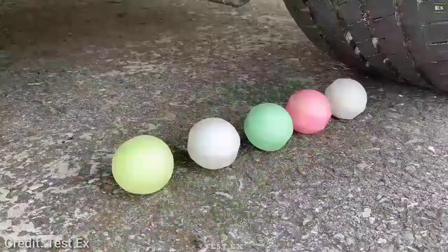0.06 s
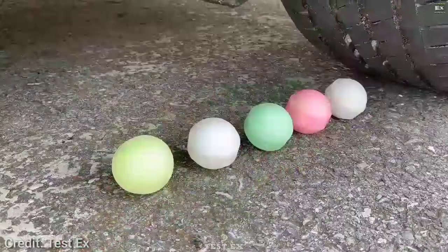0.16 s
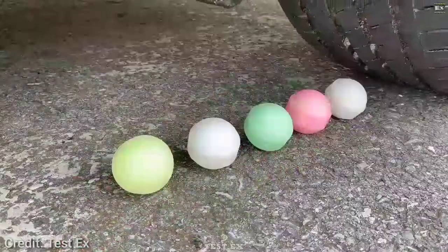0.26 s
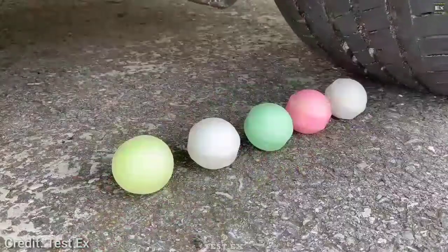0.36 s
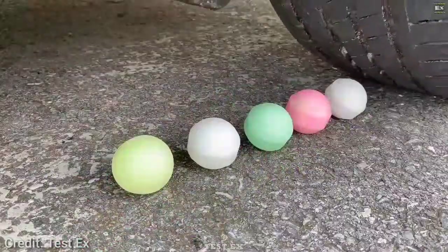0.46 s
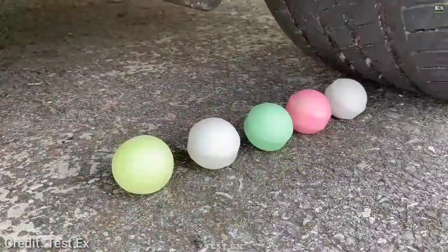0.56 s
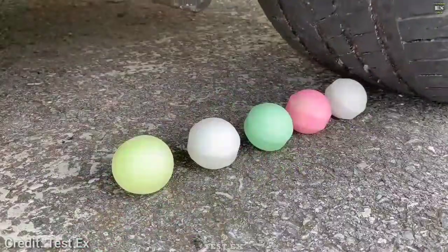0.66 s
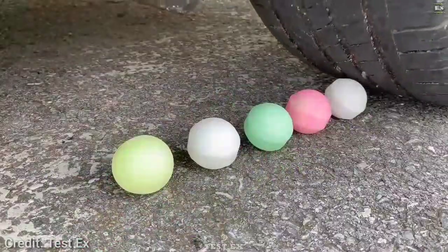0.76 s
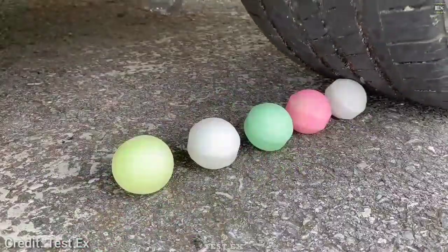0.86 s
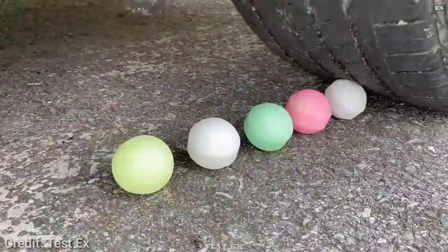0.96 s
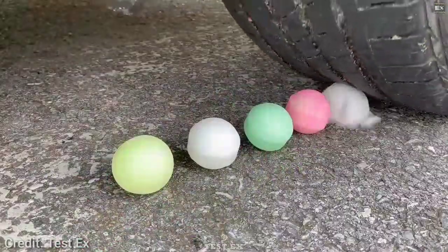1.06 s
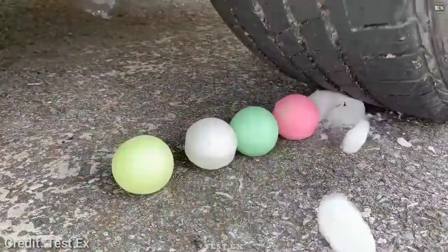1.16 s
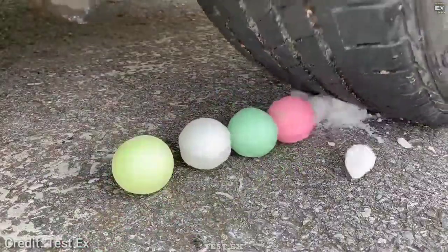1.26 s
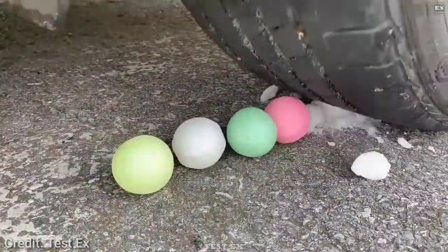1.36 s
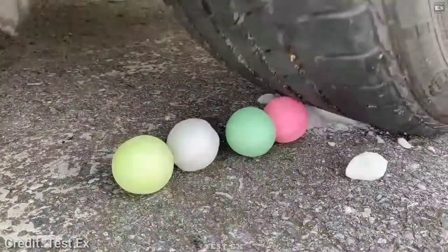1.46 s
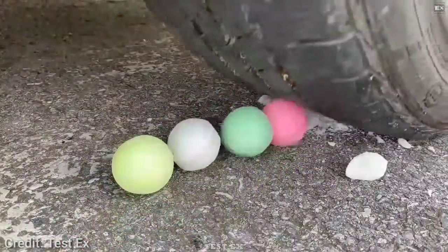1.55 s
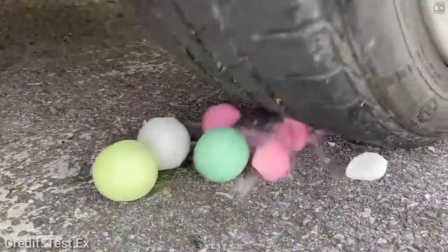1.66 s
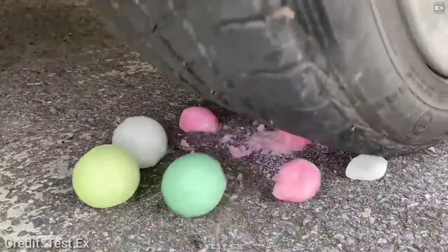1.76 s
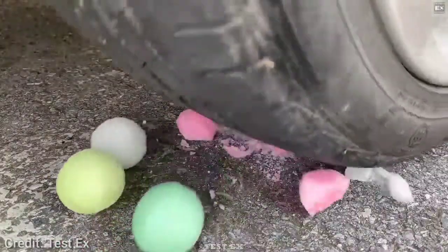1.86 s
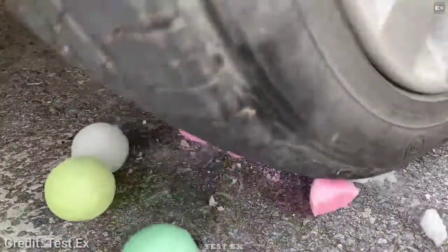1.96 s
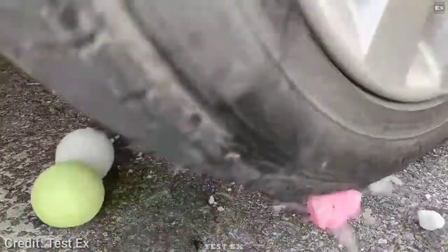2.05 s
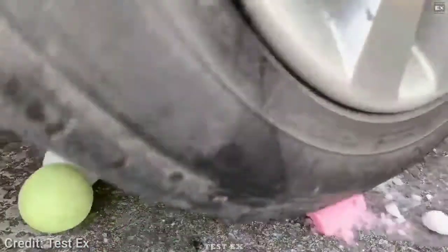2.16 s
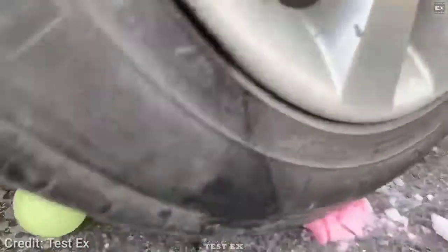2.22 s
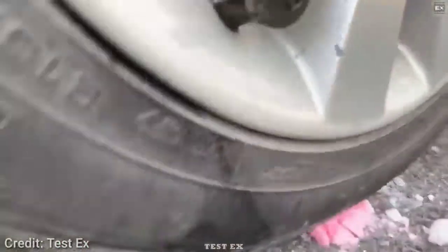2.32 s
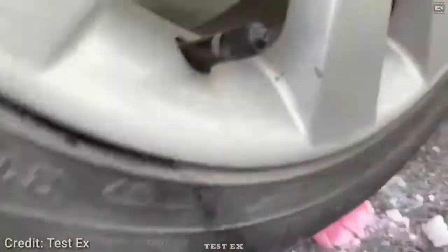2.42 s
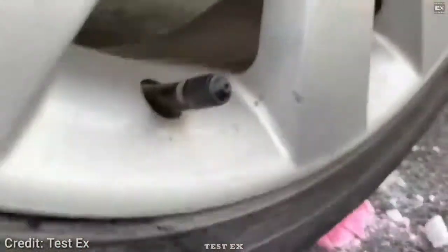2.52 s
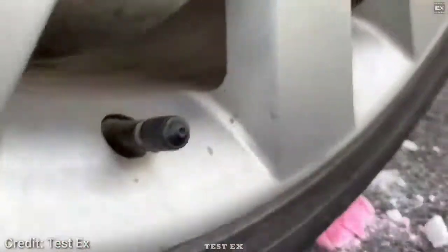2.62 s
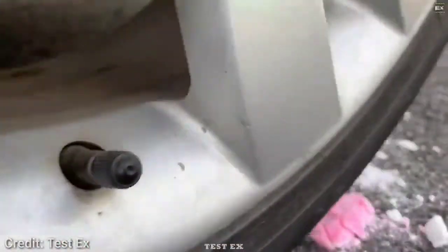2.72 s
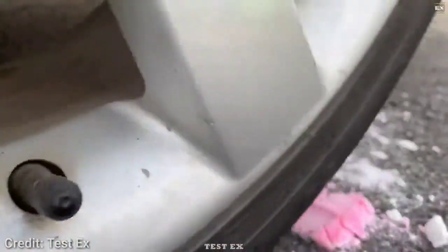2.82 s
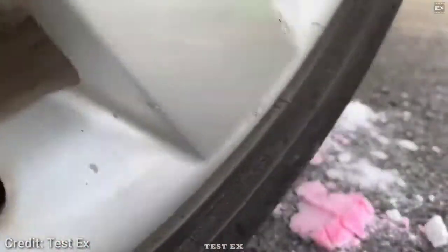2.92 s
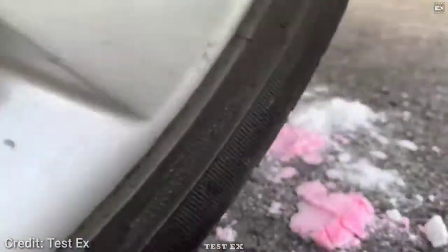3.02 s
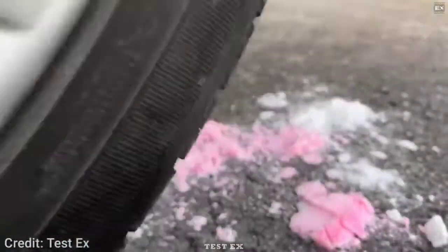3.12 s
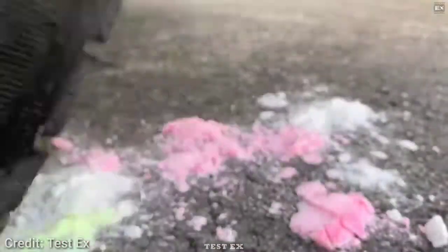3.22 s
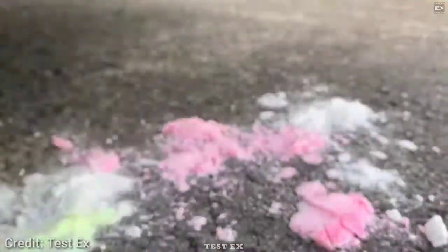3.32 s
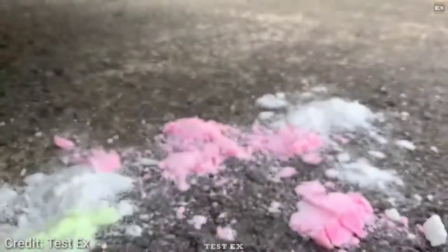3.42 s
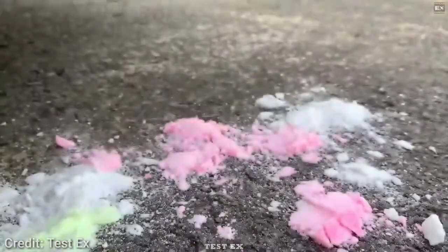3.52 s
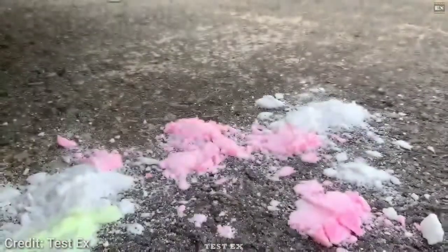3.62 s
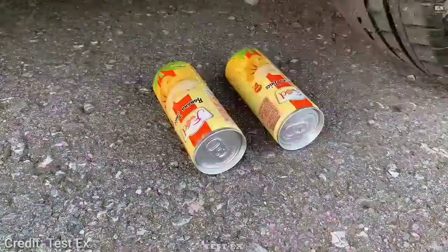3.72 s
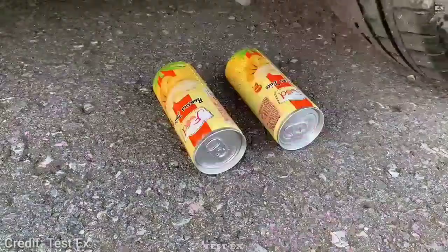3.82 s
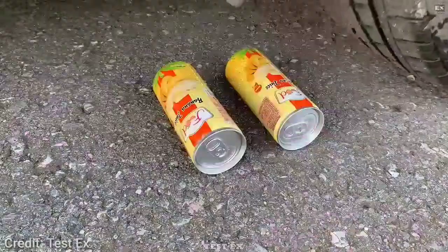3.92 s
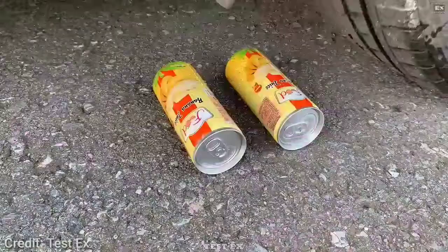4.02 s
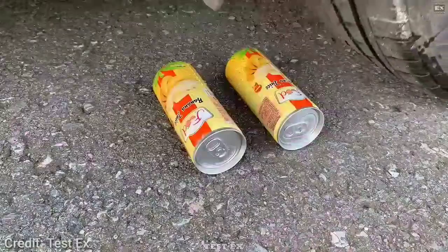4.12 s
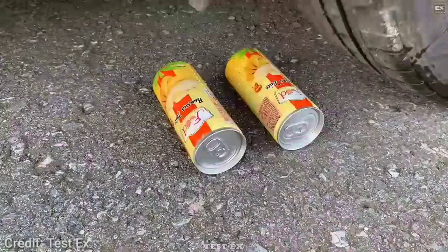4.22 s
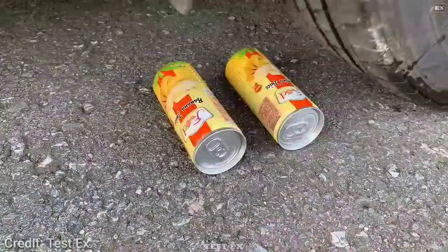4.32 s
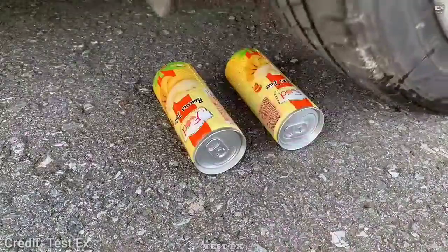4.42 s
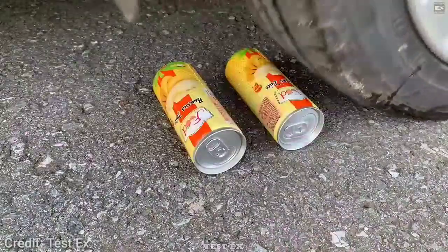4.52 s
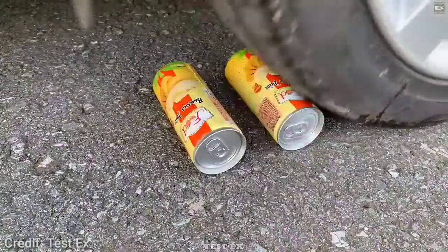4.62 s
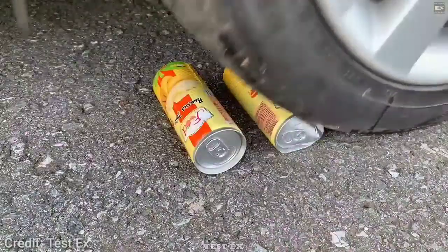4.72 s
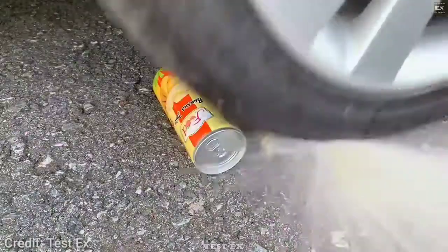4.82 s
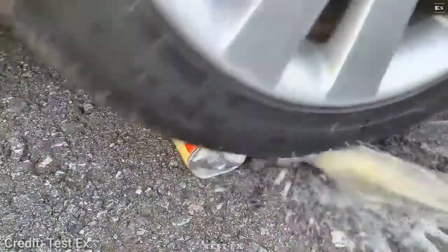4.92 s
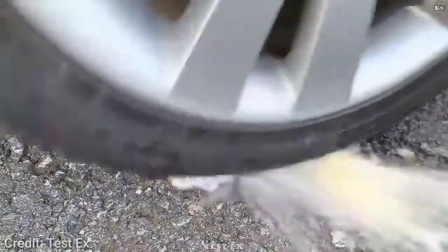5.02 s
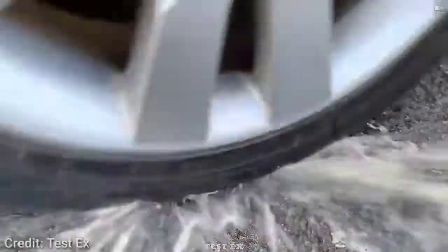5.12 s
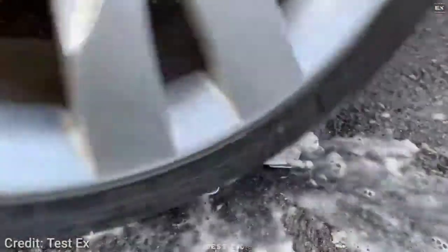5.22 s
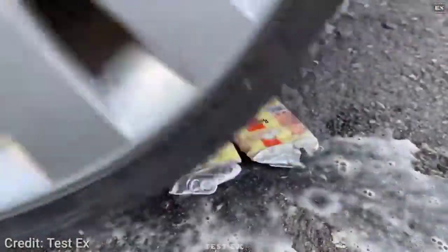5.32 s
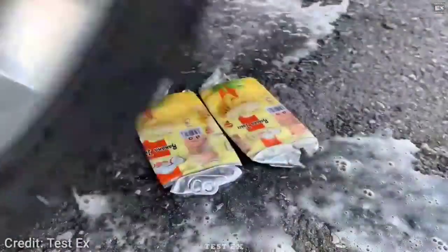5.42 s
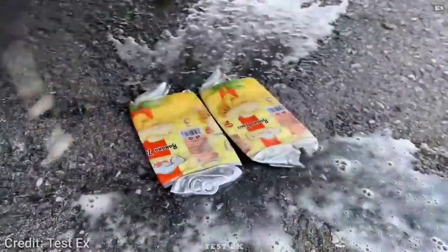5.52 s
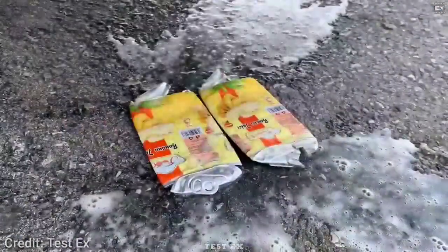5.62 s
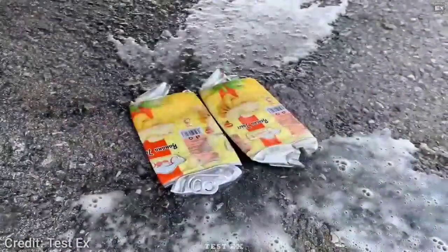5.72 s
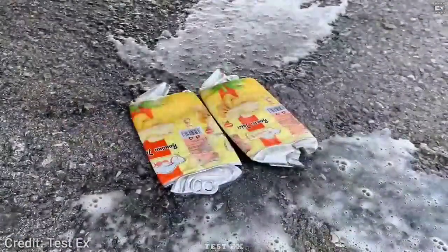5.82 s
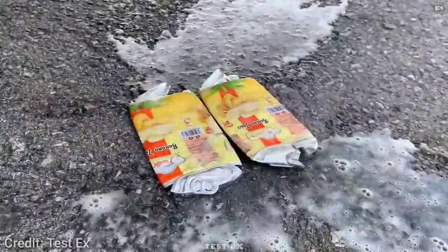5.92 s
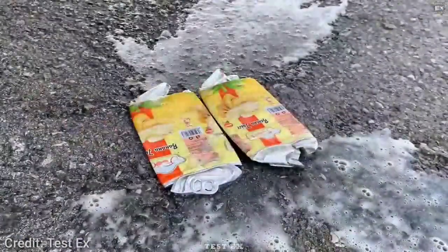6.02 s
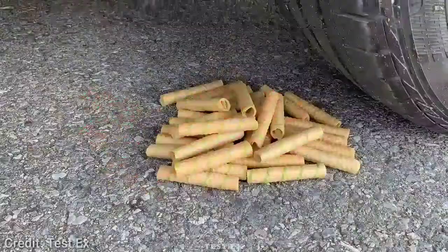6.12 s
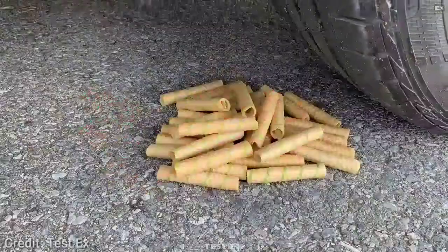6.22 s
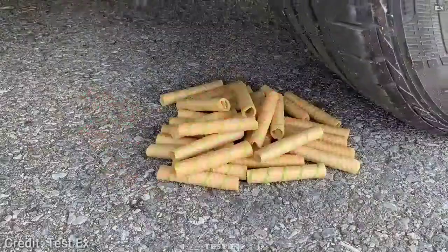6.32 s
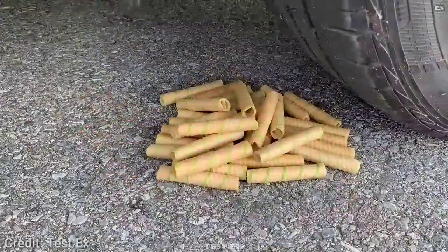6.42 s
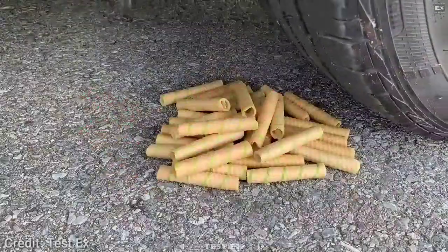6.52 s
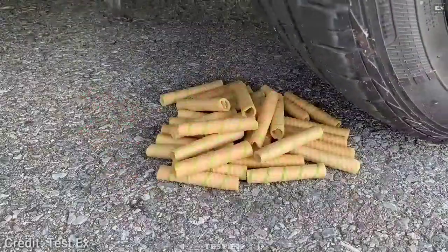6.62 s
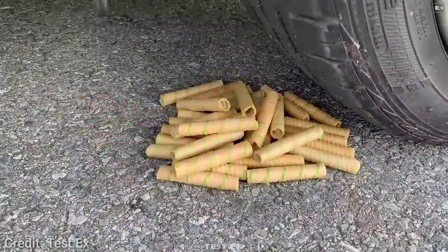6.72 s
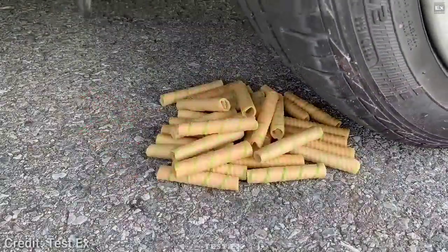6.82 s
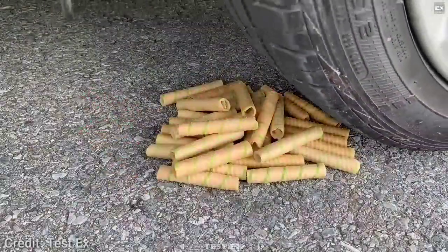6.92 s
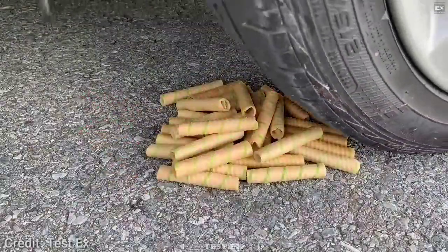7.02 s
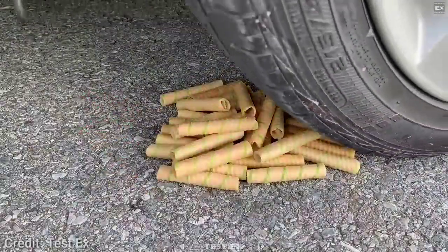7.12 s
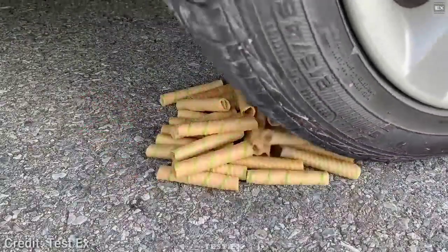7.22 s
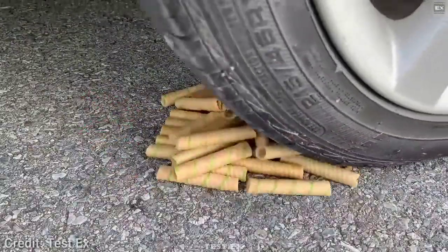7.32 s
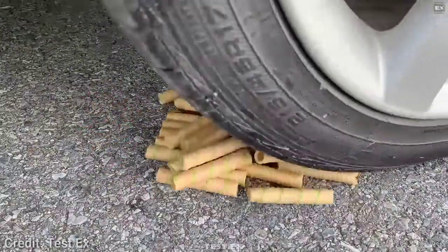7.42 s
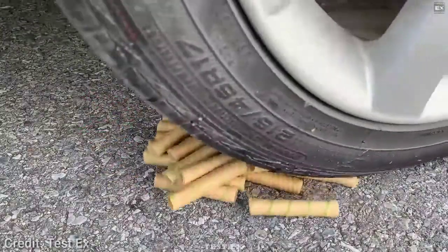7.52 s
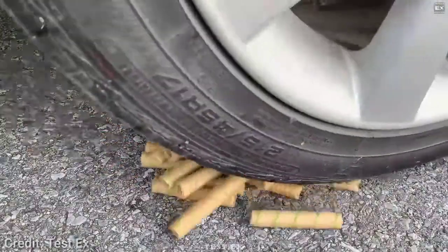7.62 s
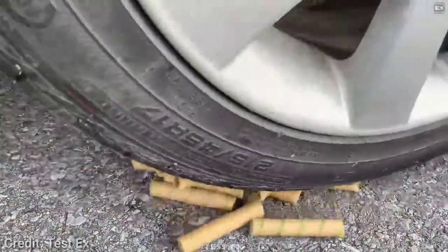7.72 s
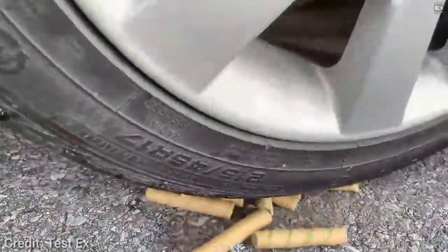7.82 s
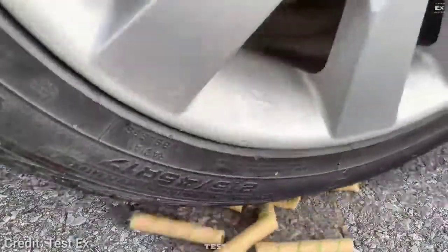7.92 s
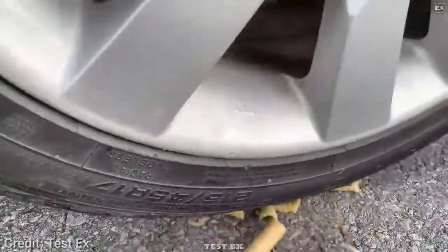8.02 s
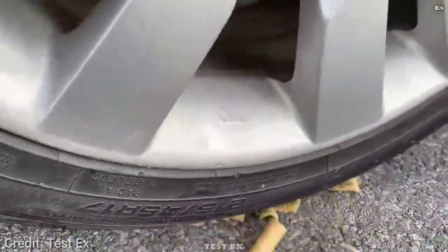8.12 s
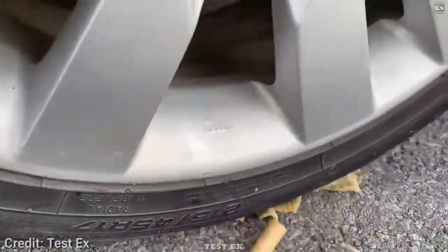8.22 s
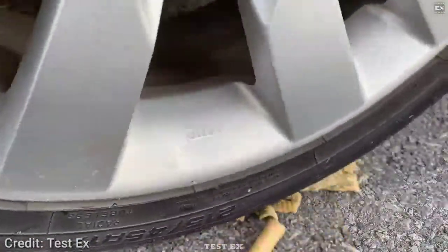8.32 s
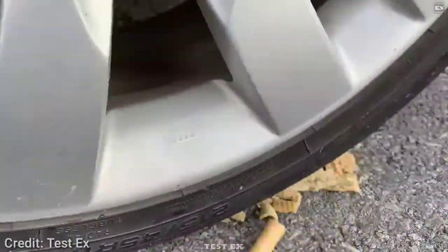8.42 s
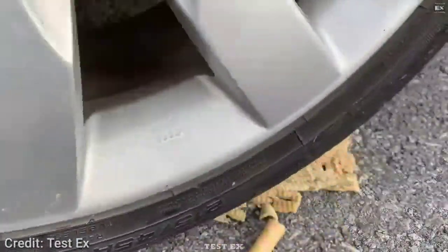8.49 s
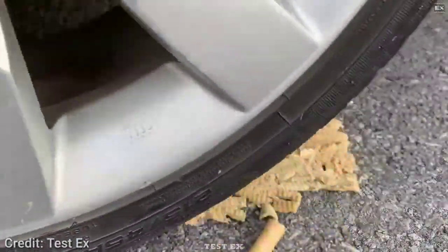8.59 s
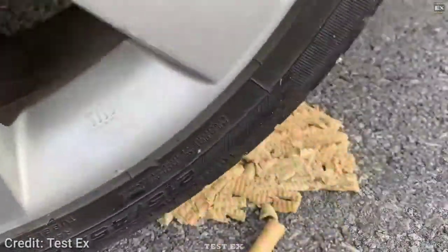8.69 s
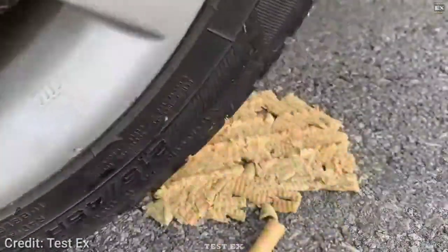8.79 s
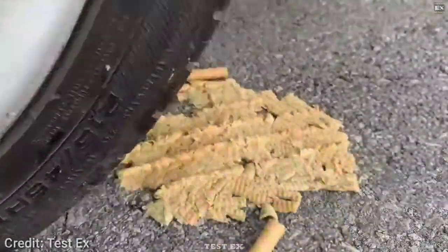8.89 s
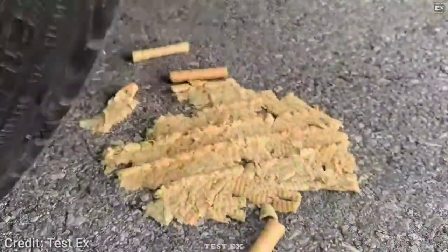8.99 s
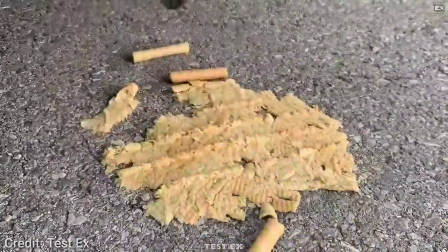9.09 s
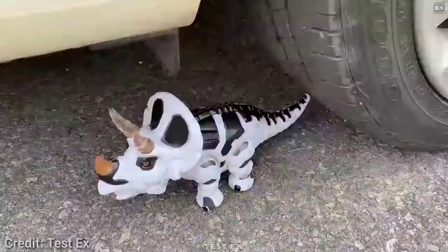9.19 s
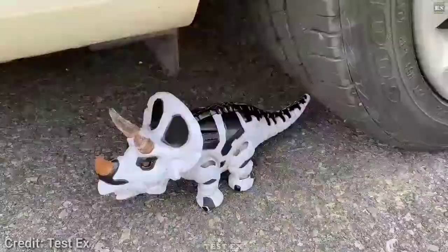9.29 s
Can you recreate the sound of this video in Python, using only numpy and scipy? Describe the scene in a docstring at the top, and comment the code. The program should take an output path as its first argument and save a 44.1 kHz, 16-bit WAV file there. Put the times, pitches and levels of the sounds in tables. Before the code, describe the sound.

Very close outdoor microphone on asphalt as a car creeps past. Hard chalk-like balls break under the tyre in uneven popping cracks with heavy thuds and crumbling. After a lull of engine hum, two full metal drink cans buckle, burst and spray hissing liquid, ending in a small tick. Finally a heap of wafer rolls crunches densely, thinning to crackling flakes and hum. The loudest blows distort.

```python
"""On asphalt, close to the microphone, a car creeps over things laid in its way, in three short scenes.
Chalky balls crack under the tyre, two full drink cans buckle and burst, a heap of wafer rolls is ground flat.
Breaks send falling chirps through the tread, over low thuds, noise snaps and the ringing wheel.
Random clicks make the fizz and crumbling; firing pulses and shaped noise make the engine and fan.
The loudest blows overload."""
import sys
import numpy as np
from scipy import signal
from scipy.fft import rfft, irfft, next_fast_len
from scipy.io import wavfile
from scipy.ndimage import uniform_filter1d

SR = 44100
rng = np.random.default_rng(int(sys.argv[2]) if len(sys.argv) > 2 else 0)


def waveform_to_disk(signal):
    """Save audio, clipped to [-1, 1], as 16-bit WAV at the path in sys.argv[1]."""
    frames = np.transpose(np.atleast_2d(signal))
    scaled = np.clip(frames, -1, 1) * 32767
    samples = np.round(scaled).astype(np.int16)
    wavfile.write(sys.argv[1], SR, samples)


N = 412335
TIME = np.arange(N) / SR
SHORT = TIME[:SR // 3]


def amp(db):
    """Decibels to gain."""
    return 10 ** (np.asarray(db) / 20)


def unit(x):
    """Scales to rms 1."""
    return x / np.sqrt(np.mean(x ** 2) + 1e-20)


def curve(rows, axis=1):
    """One column of a time table at every sample."""
    rows = np.array(rows)
    return np.interp(TIME, rows[:, 0], rows[:, axis])


def read(points, hz):
    """A table read on a log-frequency axis."""
    f, value = np.transpose(points)
    return np.interp(np.log(hz + 1), np.log(f + 1), value)


def add(mix, s, sound):
    """Lays a sound into both channels at time s."""
    part = mix[:, round(s * SR):][:, :sound.shape[-1]]
    part += sound[..., :part.shape[1]]


def swell(full_s, db, rise_s, hold_s, fall_s):
    """A level in dB that rises, holds and falls; rise and fall are the times for 30 dB."""
    before = np.maximum((full_s - TIME) / rise_s, 0)
    after = np.maximum((TIME - full_s - hold_s) / fall_s, 0)
    return db - 30 * (before + after)


def decay(t60, rise):
    """A quick rise and an exponential fall."""
    return (1 - np.exp(-SHORT / rise)) * np.exp(-np.log(1000) * SHORT / t60)


def burst(length):
    """The envelope of a puff: it swells for length seconds, then dies away."""
    u = SHORT / length
    return u * np.exp(1 - u)


def band(lo_hz, hi_hz, apart):
    """A short stereo stretch of band noise; apart is the size of its side part."""
    sos = signal.butter(2, [lo_hz, min(hi_hz, SR / 2 - 100)], "band", fs=SR, output="sos")
    mid, side = signal.sosfilt(sos, rng.standard_normal((2, len(SHORT))))
    return unit(np.array([mid + apart * side, mid - apart * side]))


def clicks(per_s, spread_db):
    """Two random trains of fractures, a few of them much larger than the rest."""
    size = amp(spread_db * np.minimum(rng.exponential(1, (2, N)), 4))
    sign = rng.choice([-1, 1], (2, N))
    return size * sign * (rng.random((2, N)) < per_s / SR)


def clumps(spread_db):
    """A gain that wanders within hundredths of a second, as fractures and bubbles come in bunches."""
    return amp(spread_db * unit(uniform_filter1d(rng.standard_normal(N), 300)))


# likeness of the two microphone ports: f/Hz, correlation (0-1)
PORT_LIKENESS = [(60, 0.94), (400, 0.94), (1000, 0.66), (2000, 0.61), (5000, 0), (13000, 0.2)]


def ports(pair, colour, lag_s):
    """Colours two unrelated signals and blends them into two ports, the right one lag_s late."""
    size = next_fast_len(N)
    hz = np.fft.rfftfreq(size, 1 / SR)
    a, b = rfft(pair, size)
    angle = np.arccos(np.clip(read(PORT_LIKENESS, hz), 0, 1)) / 2
    shared, apart = np.cos(angle) * a, np.sin(angle) * b
    late = np.exp(-2j * np.pi * hz * lag_s)
    both = np.array([shared + apart, (shared - apart) * late])
    return unit(irfft(both * amp(read(colour, hz)), size)[:, :N])


TREAD_EDGE_HZ = 2140  # rubber swallows what lies above


def chirp(hz, turns, width):
    """A bending wave in the tread: treble arrives first, so the pitch falls as 1 / time."""
    now_hz = turns / (SHORT[:SR // 25] + turns / 5000)
    bell = np.exp(-.5 * (np.log(now_hz / hz) / width) ** 2)
    strength = bell / (1 + (now_hz / TREAD_EDGE_HZ) ** 6)
    return strength * np.sin(2 * np.pi * turns * np.log(hz / now_hz))


def ring(modes, pitch=1):
    """Broad, crowded resonances dying away after a blow; pitch shifts them all."""
    out = 0
    for hz, db, t60 in modes:
        noise = band(pitch * hz / 1.28, pitch * hz * 1.2, min(hz / 2500, 1))
        out = out + amp(db) * noise * decay(t60, 0.00014)
    return out


# the tread slides from near the middle to the left of the microphone
PASS_S, PASS_TAKES_S, LEFT_DB, PAN_DB, PORT_LAG_S = 2.254, .4, 2.4, 2.3, 0.00014


def aside(sound, side):
    """Places a sound by level and delay: side 1 is louder and earlier at left, -1 near even in level."""
    left, right = sound * np.ones((2, 1))
    t, gain = TIME[:len(left)], amp((LEFT_DB + PAN_DB * side) / 2)
    return np.array([left * gain, np.interp(t - PORT_LAG_S * side, t, right) / gain])


# one row a break of a ball: t/s, chirp level/dB, chirp centre f/Hz, its width in log pitch, snap level/dB
BALL_BREAKS = [(1.1766, -0.5, 1010, 0.63, -15.5), (1.2004, -4.5, 820, 0.69, -16.5),
               (1.2466, -13, 292, 0.98, -35), (1.3293, -11.0, 840, 0.8, -48),
               (1.354, -4.5, 777, 0.93, -28.5), (1.378, -3.5, 1026, 0.62, -28),
               (1.4102, -4.5, 1160, 0.93, -34), (1.4614, 0, 930, 0.17, -30),
               (1.4936, -15.5, 680, 0.83, -41), (1.5511, -9.5, 720, 0.69, -46),
               (1.7006, -1.5, 1390, 0.97, -17), (1.7651, -4.5, 980, 0.86, -23.5),
               (1.8312, -2.5, 650, 0.19, -44), (1.838, -0.5, 854, 0.3, -33), (1.8885, -5.5, 860, 0.53, -39),
               (1.9354, -7.8, 654, 0.54, -47), (1.962, -2.4, 900, 0.78, -21),
               (1.9886, -2, 685, 0.57, -30.5), (2.0083, -9.7, 467, 0.4, -42), (2.0375, -6, 627, 0.42, -43),
               (2.0598, 0.5, 573, 0.27, -27), (2.142, -0.5, 734, 0.24, -30), (2.1532, 0.5, 386, 0.33, -38),
               (2.1674, -9, 420, 0.83, -34), (2.1804, -4, 820, 0.65, -19.5), (2.205, -8, 465, 0.35, -38),
               (2.2315, 0, 635, 0.53, -33), (2.3051, -7.5, 587, 0.58, -36), (2.3319, -7, 930, 0.76, -35),
               (2.3749, -5.5, 746, 0.75, -37), (2.4302, -4, 740, 0.87, -21), (2.4663, -3.5, 650, 0.69, -32),
               (2.5102, -5, 620, 0.98, -22.5), (2.5341, -5.5, 740, 0.89, -27), (2.5526, -2, 563, 0.73, -30),
               (2.5716, -8.5, 510, 0.9, -42), (2.5824, -12.5, 427, 0.94, -35.5),
               (2.6148, -6, 310, 0.75, -50), (2.6354, -12, 394, 0.88, -39), (2.6619, -17, 435, 1, -49),
               (2.7504, -3.5, 445, 0.43, -33), (2.772, -8.6, 416, 0.89, -33), (2.7943, -6, 350, 0.83, -29),
               (2.846, -15.9, 395, 0.78, -52), (3.069, -17, 320, 0.43, -46.5),
               (3.3377, -13.5, 443, 0.76, -45), (3.3617, -13.5, 350, 0.3, -48)]
# the tyre falls as a whole ball gives way: t/s, level/dB
TYRE_FALLS = [(1.203, -11.5), (1.765, -15.5), (2.155, -16.5), (2.432, -12), (2.512, -16.5), (2.8, -15),
              (3.36, -30)]
# how the wheel and its well ring on after a blow, at pitch 1: f/Hz, level/dB, t60/s
WHEEL_MODES = [(363.4, -10.5, 0.15), (860, -6, 0.033), (1380, -13.5, 0.025)]
# the thud grows with the force, with the depth of the chirp, and as the wheel comes closest
THUD_DB, THUD_DB_PER_OCTAVE, USUAL_HZ = -18.5, 5, 730
CLOSEST_S, CLOSE_FOR_S, CLOSE_DB = 3.08, 0.71, 6


def balls():
    """Each break: a snap, a tread chirp (wide as a whip or narrow as a knock), a thud, the wheel ringing."""
    out = np.zeros((2, N))
    for s, db, hz, width, snap_db in BALL_BREAKS:
        side = np.tanh((s - PASS_S) / PASS_TAKES_S)
        add(out, s, amp(db) * aside(chirp(hz, turns=1.8 - 0.28 * side, width=width), side))
        wheel = ring(WHEEL_MODES, pitch=(hz / USUAL_HZ) ** 0.2)
        add(out, s + 0.00099, amp(db - 3.5) * aside(wheel, side))
        # smaller pieces give way too
        for late_s, smaller_db, pitch in rng.uniform([-.005, 11, .7], [.035, 23, 1.8], (3, 3)):
            piece = chirp(pitch * hz, turns=2.56, width=0.15)
            add(out, s + late_s, amp(db - smaller_db) * aside(piece, side))
        close_db = CLOSE_DB * np.exp(-((s - CLOSEST_S) / CLOSE_FOR_S) ** 2)
        thud_db = THUD_DB + db + THUD_DB_PER_OCTAVE * np.log2(USUAL_HZ / hz) + close_db
        add(out, s, amp(thud_db) * band(65, 215, 0.2) * decay(0.27, 0.011))
        # crumbs grind on after the snap
        grind = burst(0.00059) + amp(-16) * burst(0.0025) + amp(-30) * burst(0.019)
        shard = rng.uniform(0.68, 0.96)  # small pieces snap higher than large ones
        snap = amp(2.5) * band(1800 * shard, 4400 * shard, 0.7) + amp(-4.0) * band(4200, 13000, 0.93)
        add(out, s, amp(snap_db) * snap * grind)
    for s, db in TYRE_FALLS:
        add(out, s, amp(db) * band(69, 226, 0.18) * decay(0.37, 0.0065))
    return out


CRUMBS_PER_S = 95


def crumbs():
    """Loose pieces give way at random among the big breaks, each with a small chirp of its own."""
    out = np.zeros((2, N))
    level_db = swell(full_s=1.85, db=-22.5, rise_s=.25, hold_s=.7, fall_s=.6)
    heard = level_db > -50
    for at in np.flatnonzero(heard & (rng.random(N) < CRUMBS_PER_S / SR)):
        size, pitch = rng.uniform(-1, 1, 2)
        piece = chirp(720 * 2 ** (.7 * pitch), turns=2.5, width=0.16)
        add(out, at / SR, amp(level_db[at] + 2.4 * size) * piece)
    return out


# one row a buckle of a can: t/s, chirp level/dB, base f/Hz (the chirp centres 1.16 times higher)
CAN_BUCKLES = [(4.8672, -1, 435), (4.8728, 0.5, 323), (4.882, 3.5, 940), (4.8853, -1, 790),
               (4.898, -4, 500), (4.9316, 5.5, 1050), (5.072, -7.5, 840), (5.107, -5.5, 1140),
               (5.1538, -4.5, 400), (5.165, 2.5, 808), (5.219, -18, 1300), (5.2622, -17, 1070)]
# crumpling can wall: f/Hz, level/dB, t60/s
CAN_MODES = [(293, -5, 0.054), (1050, -11.5, 0.044), (1640, -19, 0.04)]
# a can splits open: t/s, jet level/dB, jet swell/s, push level/dB, push f/Hz
CAN_BURSTS = [(4.975, -6.5, 0.0057, 2, 110), (5.15, -10.5, 0.013, -2.5, 94)]
# the flattened can's lid springs back with a tick: f/Hz, level/dB, t60/s
LID_MODES = [(1653, -19, 0.021), (2250, -26, 0.028)]
LID_TICK_S = 5.437
# gas whistles through a fold: t/s, level/dB, start f/Hz, end f/Hz
FOLD_SQUEAKS = [(4.815, -25.5, 4850, 4020), (5.13, -24, 2730, 4540)]
# thud and snap of a buckle follow its strength
BUCKLE_THUD_DB, BUCKLE_THUD_PER_DB, BUCKLE_SNAP_DB, BUCKLE_SNAP_PER_DB = -4, 1.5, -28, 1.1


def cans():
    """Can walls give way in jerks and squeak; each can splits with a jet of drink and a low push."""
    out = np.zeros((2, N))
    for s, db, hz in CAN_BUCKLES:
        add(out, s, amp(db) * chirp(1.16 * hz, turns=1.62, width=0.26))
        add(out, s, amp(db - 1.5) * ring(CAN_MODES))
        thud_db = BUCKLE_THUD_DB + BUCKLE_THUD_PER_DB * db + THUD_DB_PER_OCTAVE * np.log2(USUAL_HZ / hz)
        add(out, s, amp(thud_db) * band(174, 292, 0.22) * decay(0.068, 0.0021))
        snap_db = BUCKLE_SNAP_DB + BUCKLE_SNAP_PER_DB * db
        add(out, s, amp(snap_db) * band(1700, 9300, 1.0) * burst(0.0034))
    for s, jet_db, length, push_db, push_hz in CAN_BURSTS:
        jet = 0.48 * band(2600, 13200, 1.0) + 0.66 * band(500, 2570, 0.58)
        add(out, s, amp(jet_db) * jet * burst(length))
        push = np.sin(2 * np.pi * push_hz * SHORT) * decay(.06, .001)
        add(out, s + .008, amp(push_db) * push)
    for hz, db, t60 in LID_MODES:
        add(out, LID_TICK_S, amp(db) * np.sin(2 * np.pi * hz * SHORT) * decay(t60, 0.00028))
    for s, db, start_hz, end_hz in FOLD_SQUEAKS:
        glide = np.linspace(start_hz, end_hz, SR // 80)
        flutter = 1 + band(100, 960, 0.76)[:, :len(glide)]  # the wet gap opens and shuts
        whistle = np.sin(2 * np.pi * np.cumsum(glide) / SR)
        add(out, s, amp(db) * np.hanning(len(glide)) * flutter * whistle)
    return out


# each can leaks or sprays its drink: full from t/s, level/dB (before a 2.5 dB lift), rise/s, hold/s, fall/s
SPRAYS = [(4.72, -49, .09, .08, .1), (4.8, -35.3, .17, .2, .07), (5.17, -26.5, .07, .085, .085),
          (5.35, -44, .08, .08, .27)]
# spectrum of the fizz: f/Hz, level/dB per Hz
FIZZ_COLOUR = [(240, -21), (500, 9.5), (2000, 0), (3400, -2.5), (13000, -6), (16000, -30)]
# the flattened can spits: t/s, level/dB
CAN_SPITS = [(5.192, -25), (5.218, -17.5), (5.343, -32)]


def foam():
    """Spray and tiny bubbles, trains of random clicks, fizz unevenly; the flattened can spits noise."""
    bubbles = unit(clicks(4000, 3)) + unit(clicks(500, 2.5))
    fizz = amp(2.5) * ports(bubbles, FIZZ_COLOUR, 0)
    out = fizz * clumps(3.3) * sum(amp(swell(*spray)) for spray in SPRAYS)
    for s, db in CAN_SPITS:
        spit = band(1000, 2800, 0.8) + amp(-10.0) * band(3500, 14000, 0.97)
        add(out, s, amp(db) * spit * burst(0.0018))
    return out


WAFER_TOUCH_S, WAFER_BITE_S = 7.299, .01  # the tyre meets the wafers and bites in
# whole wafers breaking: full from t/s, level/dB (trimmed per channel and layer), rise/s, hold/s, fall/s
WAFER_CRUNCH = (7.48, -21, .42, .68, .6)
# single rolls heard apart, some loud, some faint at the start and end:
# t/s, level/dB (the chirp 5 below, its snap 19 below), f/Hz
SINGLE_ROLLS = [(7.25, -22, 650), (7.428, -6, 1300), (7.712, 0, 828), (7.745, -4, 829), (8.029, -2.5, 576),
                (8.555, -19, 2150), (8.673, -17.5, 1930)]
# the mass of rolls: level over the crunch, and the spread of their strength and pitch
TUBE_DB, TUBE_SPREAD_DB, TUBE_HZ, TUBE_OCTAVES, TUBES_PER_S = 3, 4.5, 870, .9, 380


def tubes():
    """Whole rolls cave in, each hollow tube chirping at its own pitch; a few single ones are heard apart."""
    out, level_db = np.zeros((2, N)), swell(*WAFER_CRUNCH) + TUBE_DB
    crushing = (TIME > WAFER_TOUCH_S) & (level_db > -50)
    for at in np.flatnonzero(crushing & (rng.random(N) < TUBES_PER_S / SR)):
        size, pitch, side = rng.uniform(-1, 1, 3)
        pan_db = np.array([[1], [-1]]) * (1.0 + 1.6 * side)
        gain = amp(level_db[at] + TUBE_SPREAD_DB * size + pan_db)
        rise = .3 * (at / SR - WAFER_CRUNCH[0])  # octaves, as the pieces get smaller
        hz = TUBE_HZ * 2 ** (TUBE_OCTAVES * pitch + rise)
        add(out, at / SR, gain * chirp(hz, turns=4.52, width=0.15))
    for s, db, hz in SINGLE_ROLLS:
        add(out, s, amp(db - 5.0) * chirp(hz, turns=1.96, width=0.3))
        add(out, s, amp(db - 19) * band(2000, 12000, 1.0) * burst(0.00078))
    return out


# flakes outlast the whole wafers: full from t/s, level/dB, rise/s, hold/s, fall/s
WAFER_FLAKES = (7.395, -19.5, .46, .93, .4)
# spectra of the crunch and of the flakes: f/Hz, level/dB per Hz
WAFER_CRUNCH_COLOUR = [(41, -5), (80, -0.5), (200, -5.5), (360, 1.5), (500, -9.5), (830, -1.5), (1340, -4),
                       (1800, -8.5), (2600, -14), (3400, -63), (5700, -70)]
WAFER_FLAKE_COLOUR = [(900, 2.5), (2000, -3.5), (7000, -4.5), (9500, -3), (14000, -7), (15300, -7),
                      (16000, -27)]


def wafers():
    """Hundreds of thin walls break a second, each a little chirp in the tread, under a crackle of flakes."""
    hz = np.fft.rfftfreq(2048, 1 / SR)
    dispersion = irfft(np.exp(-2j * np.pi * 1.445 * np.log1p(hz / 120)))  # delays the bass most
    breaks = clicks(550, 2.7)
    chirps = signal.oaconvolve(breaks, dispersion[None], axes=1)[:, :N]
    crunch = ports(chirps, WAFER_CRUNCH_COLOUR, 0)
    tearing = uniform_filter1d(abs(breaks), size=24) * rng.standard_normal((2, N))
    flakes = ports(unit(clicks(4000, 2.3)) + .7 * unit(tearing), WAFER_FLAKE_COLOUR, 0)
    crunch_gain = amp(swell(*WAFER_CRUNCH) + [[1], [-2]])  # left, right
    sound = crunch_gain * crunch + amp(swell(*WAFER_FLAKES)) * flakes * clumps(1.3)
    return sound * np.clip((TIME - WAFER_TOUCH_S) / WAFER_BITE_S, .12, 1)


# grit and wafer flakes pinched by the tread: t/s, level/dB
GRIT_TICKS = [(4.523, -31), (5.306, -32), (5.508, -31), (7.304, -22), (7.948, -13), (8.581, -27),
              (8.592, -30)]


def grit():
    """Small stones and flakes tick under the tread as short puffs of bright noise."""
    out = np.zeros((2, N))
    for s, db in GRIT_TICKS:
        add(out, s, amp(db) * band(2500, 14000, .9) * burst(.0015))
    return out


# the wheel drops: t/s, level/dB
WHEEL_DROPS = [(1.208, -18), (2.803, -24.5), (4.88, -22), (5.169, -20.5)]
CAVITY_HZ, CAVITY_T60 = 231, 1.1  # the air ring inside the tyre; t60 in s


def cavity():
    """The air inside the tyre hums on as a decaying tone after the wheel drops."""
    out, t = np.zeros((2, N)), TIME[:SR]
    for s, db in WHEEL_DROPS:
        hum = np.sin(2 * np.pi * CAVITY_HZ * t) * np.exp(-np.log(1000) * t / CAVITY_T60)
        add(out, s, amp(db) * hum)
    return out


def underbody(x, db, count=12):
    """The rim, sill and ground throw back a few close reflections of everything but the bass."""
    taps = np.zeros((2, SR // 60))
    places = rng.integers(SR // 900, SR // 60, (2, count))
    np.put_along_axis(taps, places, rng.choice([-1., 1.], (2, count)), 1)
    bright = signal.sosfilt(signal.butter(1, 700, "high", fs=SR, output="sos"), x)
    return amp(db) * signal.oaconvolve(bright, taps / np.sqrt(count), axes=1)[:, :N]


# one row a run of the car, the first a brief lead-in; levels before throttle and passing act on them:
# start t/s, engine goes by t/s, time it takes/s, boom level/dB, exhaust putter level/dB, fan level/dB
CAR_RUNS = [(0, 1.1, 0.43, -31.5, -51.5, -44.5), (0.301, 2.66, 0.34, -29.5, -44.5, -38.5),
            (3.912, 5.55, 0.064, -34.5, -48, -41), (6.202, 9.74, 0.27, -32.5, -46.5, -38.5)]
# a push climbs the cans, then the foot lifts:
# t/s, throttle (1 = loud push, about -0.3 = creeping, lower = engine quieter)
THROTTLE_PUSH = [(4.31, -0.33), (4.84, 0.98), (5.03, 0.32), (5.42, 0.13), (5.7, -0.81), (5.93, -0.22)]
THROTTLE_BOOM_DB, THROTTLE_PUTTER_DB = 14, 23.5
# the fan grows as the car nears; once the engine is by, fan and boom are screened and the exhaust is nearer
NEARING_DB_PER_S, FAN_SCREENED_DB, BOOM_SCREENED_DB, EXHAUST_NEARER_DB = 1.08, 12.5, 0.5, 7


def car_levels():
    """Boom, putter and fan in dB, from where the car is in its run and how hard it is driven."""
    runs = np.array(CAR_RUNS)
    _, by_s, takes_s, boom_db, putter_db, fan_db = runs[np.searchsorted(runs[1:, 0], TIME)].T
    gone_by = (1 + np.tanh((TIME - by_s) / takes_s / 2)) / 2
    throttle = curve(THROTTLE_PUSH)
    return (boom_db - BOOM_SCREENED_DB * gone_by + THROTTLE_BOOM_DB * throttle,
            putter_db + EXHAUST_NEARER_DB * gone_by + THROTTLE_PUTTER_DB * throttle,
            fan_db - FAN_SCREENED_DB * gone_by - NEARING_DB_PER_S * abs(TIME - by_s))


# engine speed: t/s, firings per second f/Hz
FIRING_RATE = [(2.5, 27), (3.4, 21), (4.0, 22.2), (4.85, 34.2), (6.1, 27), (6.3, 26)]
# exhaust pipe resonances: f/Hz, level/dB, t60/s
PIPE_MODES = [(137.7, -6.5, 0.093), (250.8, -1, 0.066), (313, 0.5, 0.034)]
# spectra of the boom and of the putter: f/Hz, level/dB per Hz
ENGINE_BOOM_COLOUR = [(15, -25.5), (30, -7), (45, 0.5), (82, -0.5), (126, -4), (260, -32), (700, -100)]
EXHAUST_COLOUR = [(70, -22), (110, -10), (140, -10), (180, 6), (235, -3), (280, -1.5), (350, -17),
                  (1200, -69.5)]


def engine(boom_db, putter_db):
    """Firings of uneven strength boom under the car; each one rings the exhaust with a puff of gas."""
    count = np.floor(np.cumsum(curve(FIRING_RATE)) / SR).astype(int)
    pulses = np.diff(count, prepend=0) * amp(rng.standard_normal(N))
    drive = np.array([unit(pulses), np.zeros(N)])
    boom = ports(drive + rng.standard_normal((2, N)), ENGINE_BOOM_COLOUR, 0.00026)
    pipe = sum(amp(db) * np.sin(2 * np.pi * hz * SHORT) * decay(t60, 0.0047) for hz, db, t60 in PIPE_MODES)
    exhaust = unit(signal.oaconvolve(drive, pipe[None], axes=1)[:, :N])
    puff_gain = .2 + unit(signal.oaconvolve(pulses, burst(.005))[:N])
    puffs = puff_gain * rng.standard_normal((2, N))
    putter = amp(5) * ports(exhaust + amp(16) * unit(puffs), EXHAUST_COLOUR, 0)
    return amp(boom_db) * boom + amp(putter_db) * putter


# spectrum of the fan: f/Hz, level/dB per Hz
FAN_COLOUR = [(150, -2), (280, 0.5), (566, -3), (1220, -10.5), (2670, -17), (4300, -18.5), (7190, -26),
              (8850, -22.5), (13400, -29), (15200, -26.5), (16000, -69.5)]


def air(fan_db):
    """Hiss of the cooling fan, coloured noise that reaches the left port first."""
    return amp(fan_db) * ports(rng.standard_normal((2, N)), FAN_COLOUR, 0.000382)


def scene():
    """The three crushings over the running car."""
    boom_db, putter_db, fan_db = car_levels()
    blows = balls() + crumbs() + cans() + tubes()
    small = foam() + wafers() + grit() + air(fan_db)
    reflections = underbody(blows, -15.5) + underbody(small, -4.0)
    return blows + small + reflections + cavity() + engine(boom_db, putter_db)


EDGE_HZ = 15900  # upper band limit


def record(dry):
    """The loudest blows clip with a rounded knee; then the band limit."""
    clipped = dry / (1 + np.abs(dry) ** 8) ** (1 / 8)
    lowpass = signal.firwin(255, EDGE_HZ, window=("kaiser", 8), fs=SR)
    return signal.oaconvolve(clipped, lowpass[None], "same")


dry = scene()
out = record(dry)
waveform_to_disk(out)
```